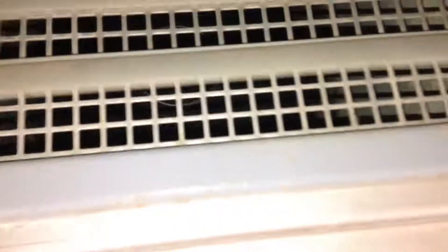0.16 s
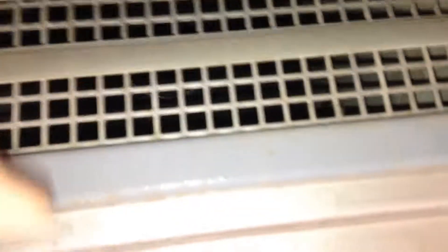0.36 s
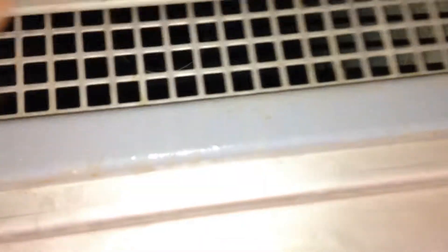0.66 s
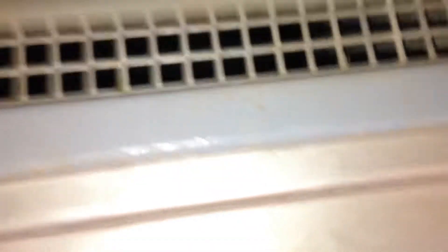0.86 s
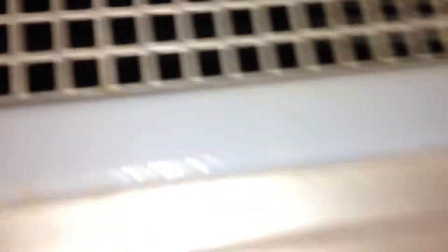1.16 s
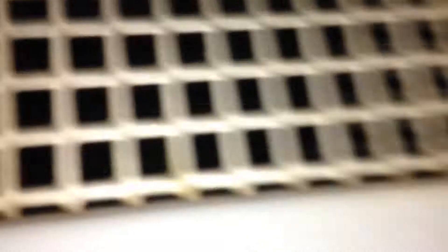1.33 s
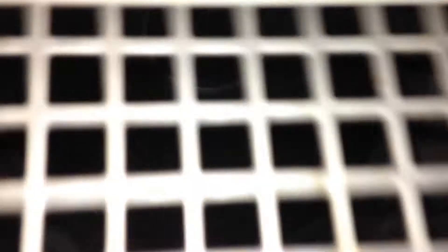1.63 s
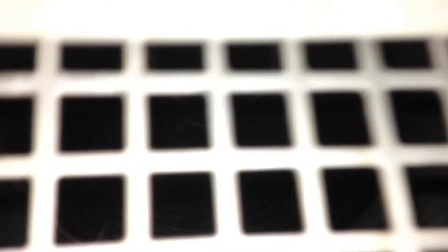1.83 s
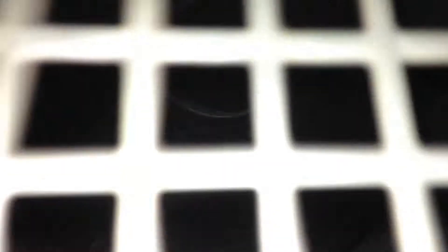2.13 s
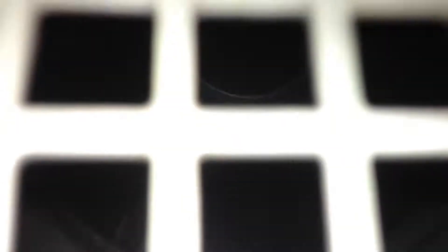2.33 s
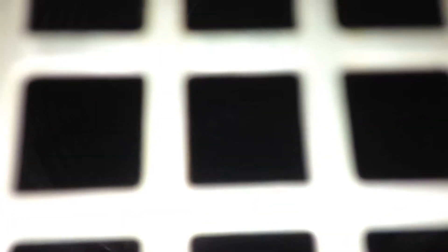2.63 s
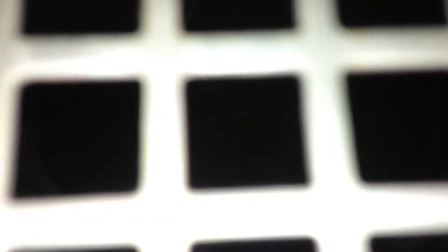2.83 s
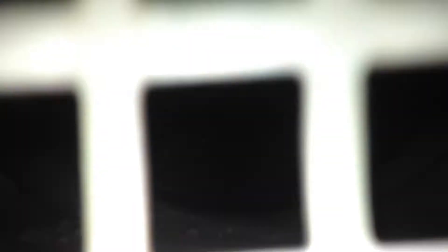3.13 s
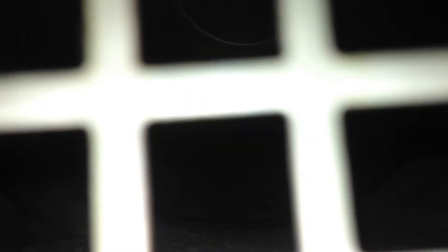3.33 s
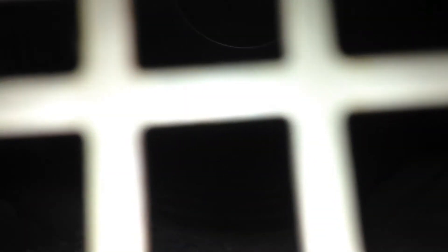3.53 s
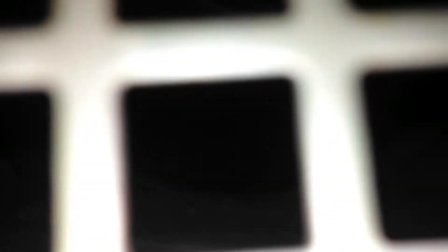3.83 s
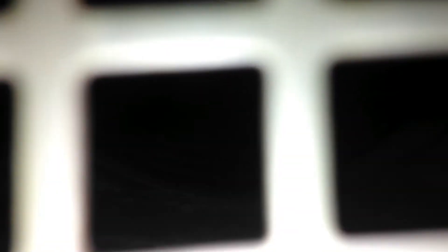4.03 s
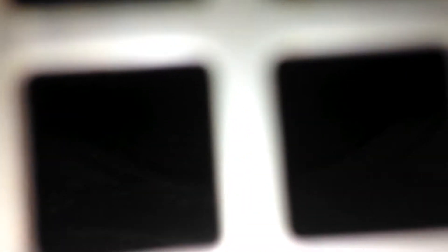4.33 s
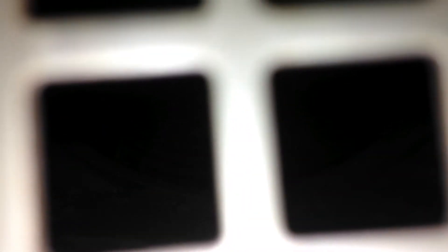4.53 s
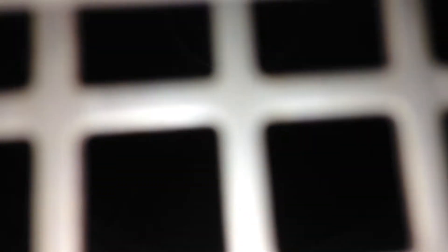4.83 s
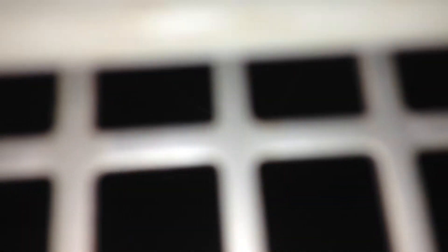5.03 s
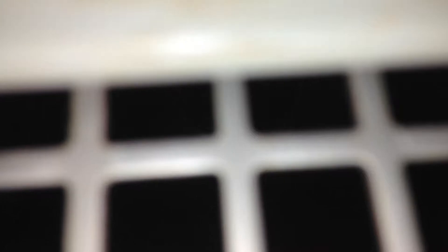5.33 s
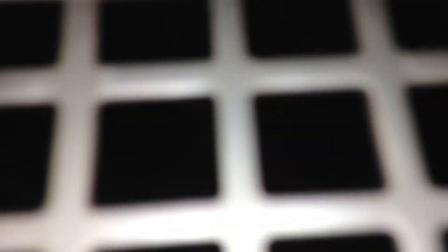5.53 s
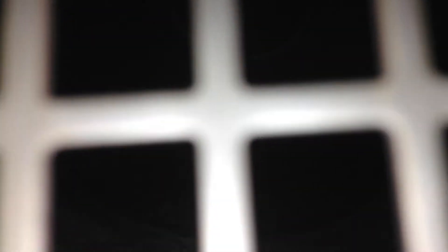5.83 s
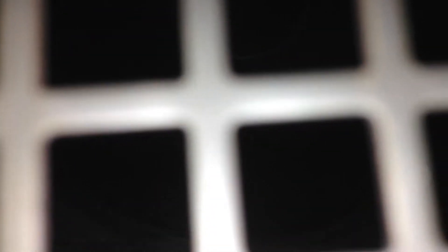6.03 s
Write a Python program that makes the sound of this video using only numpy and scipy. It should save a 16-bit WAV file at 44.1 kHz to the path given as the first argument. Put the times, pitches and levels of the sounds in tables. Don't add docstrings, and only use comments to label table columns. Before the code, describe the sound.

Big exhaust fans rush and hum with a thin high whine as a bare microphone pushes into the jet, wind thumping, puffing and crackling over it.

```python
import sys
import numpy as np
from scipy import signal
from scipy.fft import rfft, irfft
from scipy.io import wavfile
from scipy.ndimage import uniform_filter1d, minimum_filter1d

SR = 44100
rng = np.random.default_rng(int(sys.argv[2]) if len(sys.argv) > 2 else 0)


def pcm_store(signal):
    levels = np.round(np.clip(np.atleast_2d(signal), -1, 1) * 32767)
    wavfile.write(sys.argv[1], SR, levels.astype(np.int16).T)


def volts_from_decibels(level):
    exponent = np.asarray(level, float) / 20
    return 10 ** exponent


N = 272538
SHAFT_HZ, BLADES = 23.3, 6


def evened(x):
    return x / np.sqrt(np.mean(x ** 2) + 1e-20)


def curve(rows, column):
    rows = np.array(rows)
    return np.interp(np.arange(N) / SR, rows[:, 0], rows[:, column])


def colour(x, points):
    point_hz, point_db = np.transpose(points)
    hz = np.fft.rfftfreq(len(x), 1 / SR)
    gain_db = np.interp(np.log(hz + 1), np.log(point_hz + 1), point_db, -120, -120)
    return evened(irfft(rfft(x) * volts_from_decibels(gain_db), len(x)))


def lumps(hz):
    lowpass = signal.butter(2, hz, fs=SR, output="sos")
    return evened(signal.sosfilt(lowpass, rng.standard_normal(N)))


def add(mix, s, sound):
    start = max(round(s * SR) - len(sound) // 2, 0)
    part = mix[start:][:len(sound)]
    part += sound[:len(part)]


def each_turn(memory):
    period = round(SR / SHAFT_HZ)
    fresh = rng.standard_normal((N // period + 30, period))
    turns = signal.lfilter([1], [1, -memory], fresh, axis=0)
    return evened(turns.ravel()[-N:])


def resonate(x, hz, width_hz):
    carrier = np.exp(2j * np.pi * np.cumsum(hz) / SR)
    r = np.exp(-np.pi * width_hz / SR)
    return 2 * (carrier * signal.lfilter([1 - r], [1, -r], x / carrier)).real


def held(level_db, fall_db_per_s):
    climb = np.arange(N) * fall_db_per_s / SR
    return np.maximum.accumulate(level_db + climb) - climb


# pitch_hz [Hz], level_db [dB]
DRIVE_LINES = [(3956, -72), (4020, -72), (4222, -73), (4565, -75), (4820, -75), (5326, -73), (5624, -73),
               (5693, -74), (6087, -74), (6215, -76), (6505, -78.5), (7603, -79.5)]


def tones():
    t = np.arange(N) / SR
    out = np.zeros(N)
    for hz, db in DRIVE_LINES:
        level = volts_from_decibels(db + 3 + 1.4 * lumps(2.7))
        out += level * np.sin(2 * np.pi * (hz * t + rng.random()))
    return out


# time_s [s], level_db [dB]
HUM_LEVEL = [(0.0, -9), (0.12, -18.5), (0.27, -7), (0.41, -18), (0.76, -12), (0.89, -44), (1.05, -34),
             (1.69, -36), (2.31, -42), (3.51, -41), (4.23, -14), (4.54, -30), (4.82, -13.5), (6.11, -31),
             (6.18, -31)]


def hum():
    turns = np.cumsum(BLADES * SHAFT_HZ + 9.03 * lumps(20.7)) / SR
    level_db = curve(HUM_LEVEL, 1) - 8.5 + 3.5 * lumps(14)
    return np.sqrt(2) * np.sin(2 * np.pi * turns) * volts_from_decibels(level_db)


# pitch_hz [Hz], density_db [dB per Hz]
RUSH_COLOUR = [(200, -0.5), (300, -13.5), (600, -16.5), (900, -12.5), (1250, -17.5), (1500, -13.5),
               (2300, -19), (2800, -25.5), (3200, -24.5), (4000, -26), (6000, -32.5), (10300, -41),
               (12300, -45), (13500, -50), (15700, -50)]


def rush():
    air = colour(rng.standard_normal(N), RUSH_COLOUR)
    hz = np.fft.rfftfreq(N, 1 / SR)
    power = np.abs(rfft(air)) ** 2
    treble = (hz > 6000) & (hz < 10000)
    share = np.sqrt(power[treble].sum() / power.sum())
    return air / share * volts_from_decibels(-59 + 0.76 * lumps(22))


# pitch_hz [Hz], density_db [dB per Hz]
SHELL_COLOUR = [(10400, -27), (10900, -17), (11150, -6), (11400, 0), (11650, -4), (12000, -9),
                (12200, -14.5), (12500, -18.5), (12750, -36)]
# time_s [s], steadiness [0-1]
HAND_STEADY = [(0, 0), (1.2, 0.1), (2.2, 1), (6.18, 0.55)]
# time_s [s], pitch_hz [Hz]
GRILLE_PITCH = [(0, 11260), (1.2, 11320), (1.7, 11480), (2.3, 11300), (2.8, 11400), (3.2, 11420),
                (6.18, 11440)]
# time_s [s], level_db [dB]
GRILLE_OPENING = [(0, 8), (.5, 5), (1.2, 4), (1.7, 1.5), (2.3, 3.5), (2.8, -0.8), (3.2, 1), (3.8, 1.5),
                  (4.6, 1.5), (5.4, -1), (6.18, -1)]


def whine():
    steady = curve(HAND_STEADY, 1)
    repeating = np.sqrt(steady) * each_turn(.62)
    scrape = repeating + np.sqrt(1 - steady) * rng.standard_normal(N)
    rough = each_turn(.98)
    spots = evened(uniform_filter1d(uniform_filter1d(rough, size=50), size=50))
    patches = evened(uniform_filter1d(uniform_filter1d(rough, size=350), size=350))
    angle = 2 * np.pi * SHAFT_HZ * np.arange(N) / SR
    wobble_hz = steady * (150 * np.sin(angle) + 90 * np.sin(2 * angle + 1))
    ring = colour(scrape, SHELL_COLOUR)
    favoured = resonate(ring, curve(GRILLE_PITCH, 1) + wobble_hz, 150)
    ring = ring + volts_from_decibels(4) * evened(favoured)
    load_db = .8 * spots + .6 * patches + 1.4 * np.cos(BLADES * angle)
    return evened(ring * volts_from_decibels(load_db)) * volts_from_decibels(-50 + curve(GRILLE_OPENING, 1))


# time_s [s], level_db [dB], length_s [s]
RUSTLES = [
    (1.158, -62, .01),
    (1.193, -46, 0.013),
]
# time_s [s], level_db [dB]
STEPS = [
    (5.2828, -20.5),
    (6.1774, -39),
]


def handling():
    out = np.zeros(N)
    for s, db, length_s in RUSTLES:
        window = signal.windows.hann(round(2 * length_s * SR))
        add(out, s, volts_from_decibels(db) * window * np.diff(rng.standard_normal(len(window) + 1)))
    for s, db in STEPS:
        t = np.arange(-200, 200) / SR
        add(out, s, volts_from_decibels(db + 13) * (t >= 0) * np.exp(-np.abs(t) / .0009))
    return out


# time_s [s], strength_db [dB], large_eddy_excess_db [dB]
JET_PATH = [(0, -32.5, 18.5), (.79, -31.5, 8.5), (.85, -28.5, 14), (1.15, -34, 13), (1.2, -27, 11),
            (1.5, -22.5, -4), (1.72, -32, 10.5), (1.8, -22.5, 0), (2.06, -22, 0.5), (2.26, -19, -2),
            (2.9, -19, 0.5), (3.11, -16.5, -2), (3.6, -19.5, 5.5), (4.2, -20, 3.5), (5.1, -21, 6.5),
            (5.76, -19.5, 5), (6.0, -23, 4), (6.18, -22, 0)]


def jet_db():
    return curve(JET_PATH, 1) + 20


# pitch_hz [Hz], density_db [dB per Hz]
RUMBLE_COLOUR = [(12, -57), (20, -37), (56, -3), (75, 1.5), (107, -3), (139, 2), (600, -24.5), (780, -55),
                 (1320, -120)]
ROAR_COLOUR = [(100, -7), (220, 0.5), (320, -2), (500, -4.5), (750, -12), (1300, -28)]
FLUTTER_COLOUR = [(400, 0), (750, -3), (1200, -5.5), (2000, -13.5), (3500, -23), (6000, -45)]
# time_s [s], swell_db [dB], length_s [s]
CLUSTERS = [(1.34, 2, 0.33), (1.94, 5.5, .06), (2.35, 2.5, 0.037), (2.452, 4, 0.043), (2.533, 7.5, 0.038),
            (2.728, 3, 0.038), (3.207, -2, 0.026), (4.176, 5, 0.3), (4.332, 6, .03), (4.486, 6, 0.021),
            (4.65, 5.5, 0.027), (4.717, -7, .025), (4.948, 0, 0.025), (5.004, 7, .03), (5.038, 6, 0.036),
            (5.609, 6, 0.075), (5.957, 10, 0.052), (6.036, 7.5, 0.021), (6.116, 4, 0.035),
            (6.152, 10.5, 0.042)]


def wind():
    gusts, flicker = lumps(29), lumps(67)
    crackle = np.clip(lumps(350) - .8, 0, 1.6)
    jet, swell = jet_db(), np.zeros(N)
    for s, db, _ in SNAP_EVENTS:
        add(swell, s, .5 * max(db + 26, 0) * signal.windows.hann(round(.04 * SR)))
    for s, db, length_s in CLUSTERS:
        add(swell, s, db * signal.windows.hann(round(length_s * SR)))
    # spectrum, level, then swing in dB by gust, flicker and crackle
    layers = [(RUMBLE_COLOUR, -22 + jet + curve(JET_PATH, 2), 1.2, .3, .1),
              (ROAR_COLOUR, -20.5 + 1.05 * jet + 0.9 * swell, 1.5, 2.8, 1.2),
              (FLUTTER_COLOUR, -32 + 0.47 * jet + swell, 1.2, 2.3, 4.8)]
    out = np.zeros(N)
    for shape, level_db, gust_db, flicker_db, crackle_db in layers:
        swing_db = gust_db * gusts + flicker_db * flicker + crackle_db * crackle
        eddies = colour(rng.standard_normal(N), shape) * volts_from_decibels(swing_db)
        out += evened(eddies) * volts_from_decibels(level_db)
    return out


# start_s [s], level_db [dB], pitch_hz [Hz]
THUMP_EVENTS = [(0.267, -2, 144), (0.497, -6, 188), (.673, -5, 140), (.734, -5, 140), (0.775, -2.5, 148),
                (0.94, -6.5, 130), (1.094, 3.5, 141), (1.192, 4, 214), (1.31, -7, 104), (1.575, -1.5, 102),
                (1.837, 0.5, 232), (1.907, 1.5, 211), (2.084, -4, 164), (2.268, 4, 200), (2.328, -4.5, 82),
                (2.53, -1.5, 159), (2.999, -5, 312), (3.07, 1, 326), (3.597, -2, 218), (3.838, -0.5, 147),
                (4.198, -6, 136), (4.4, -9, 109), (4.822, -4, 133), (5.039, 5, 192), (5.545, -6, 137),
                (5.6, -.5, 145), (5.829, 0.5, 145), (5.943, -14, 261), (6.027, -25, 306), (6.161, -5, 110)]


def thumps():
    out = np.zeros(N)
    for s, db, hz in THUMP_EVENTS:
        window = signal.windows.hann(round(2.53 * SR / hz))
        t = np.arange(len(window)) / SR
        swings = np.cos(2 * np.pi * (hz * t + rng.random()))
        add(out, s + 0.772 / hz, volts_from_decibels(db - 3.5) * window * swings)
    return out


PLAIN_TREBLE_DB = -17


def strays():
    when, size = rng.random((90, 2)).T
    when = when * (N / SR - .02)
    db = -26.5 - 3.5 * np.log(1.08 - size) + 1.5 * jet_db()[(when * SR).astype(int)]
    return list(zip(when, db, np.full(len(db), PLAIN_TREBLE_DB)))


def bursts(events, length_s, shape, trim_db):
    swings = colour(rng.standard_normal(N), shape)
    window = signal.windows.tukey(round(length_s * SR), .85)
    out = np.zeros(N)
    for s, db, hz in events:
        place = rng.random() * (N - SR) + np.arange(len(window)) * hz / 1000
        burst = np.interp(place, np.arange(N), swings)
        add(out, s + length_s / 2, volts_from_decibels(db + trim_db) * window * evened(burst))
    return out


# start_s [s], level_db [dB], pitch_hz [Hz]
PUFF_EVENTS = [(.229, -13, 505), (.835, -11, 448), (1.228, -6.5, 308), (1.376, -2, 308), (1.465, -9, 506),
               (1.506, -6.5, 382), (1.577, -3, 600), (1.65, -9.5, 460), (1.774, -4, 474),
               (1.846, -4.5, 274), (1.913, -7, 473), (1.981, -4, 373), (2.035, -5, 287), (2.091, -5, 585),
               (2.142, -8, 575), (2.575, -10, 526), (3.035, -15, 416), (3.211, -11, 544), (3.561, -5, 410),
               (3.638, -7, 310), (3.855, -3.5, 560), (4.04, -9.5, 583), (4.398, 3, 320), (4.478, -18, 352),
               (4.517, -10, 480), (4.778, -4, 502), (5.208, -8.5, 473), (5.942, 5, 322), (6.031, -2.5, 313),
               (6.114, -8.5, 442)]
# start_s [s], level_db [dB], treble_share_db [dB]
SNAP_EVENTS = [(1.9275, -18.5, -15.5), (2.0906, -15.5, -14), (2.2476, -16, -13), (2.2917, -41, -23),
               (2.3336, -25, -9), (2.712, -24, -11), (2.7312, -23.5, -13), (2.904, -26, -15),
               (3.2221, -24.5, -21.5), (3.3468, -17, -14.5), (3.4319, -8, -18), (3.6997, -19, -19),
               (3.7334, -19, -21), (3.8703, -16.5, -18), (3.9953, -15.5, -13.5), (4.1016, -11.5, -19),
               (4.2278, -14.5, -16.5), (4.3314, -22.5, -24), (4.395, -20.5, -14), (4.4786, -23.5, -12.5),
               (4.5198, -23, -17.5), (4.6049, -21, -16.5), (4.6443, -21, -21.5), (4.7272, -15, -19.5),
               (5.437, -21.5, -15.5), (5.7095, -16, -14.5), (5.7468, -17, -10), (5.7573, -15.5, -16),
               (5.8753, -21, -7), (5.9904, -18.5, -15)]


def puffs():
    dull_colour = [(250, 20), (550, 11), (1000, 15), (2000, -2), (4000, -13)]
    snap_colour = [(200, -26), (500, 6), (900, 0.5), (1700, -10), (3500, -31)]
    dull = bursts(PUFF_EVENTS, .011, dull_colour, -5.0)
    snaps = []
    for s, db, treble_db in SNAP_EVENTS + strays():
        hz = 1400 * volts_from_decibels(0.322 * (treble_db - PLAIN_TREBLE_DB))
        snaps.append((s + 0.000977, db, hz))
    return dull + bursts(snaps, 0.0066, snap_colour, 0.17)


def ducking(blows):
    power_db = 10 * np.log10(uniform_filter1d(blows ** 2, size=600).clip(1e-12))
    over_db = np.maximum(held(power_db, 32) + 13.5, 0)
    jet = np.minimum(uniform_filter1d(jet_db(), size=6000), -2)
    lean_db = held(jet, 9)
    quick = volts_from_decibels(-.64 * uniform_filter1d(over_db, size=200))
    return quick, volts_from_decibels(-.64 * lean_db)


# pitch_hz [Hz], threshold_db [dB]
HIDDEN_BELOW = [(7000, -36), (9500, -26), (10450, -22.5), (11000, -30), (11950, -18), (12450, -21),
                (13500, -23), (16000, -26)]


def masked(x):
    hz, _, z = signal.stft(x, SR, nperseg=1024, noverlap=768)
    width = 4
    power = uniform_filter1d(np.abs(z[:512]) ** 2, size=7, axis=1)
    power = power.reshape(-1, width, z.shape[1]).mean(1)
    band_hz = hz[:512].reshape(-1, width).mean(1)
    shell = uniform_filter1d(power[(band_hz > 11100) & (band_hz < 11700)].mean(0), size=30)
    point_hz, point_db = np.transpose(HIDDEN_BELOW)
    threshold_db = np.interp(band_hz, point_hz, point_db, -200)
    keep = power > shell * volts_from_decibels(2 * threshold_db)[:, None]
    z[:512] *= np.repeat(keep, width, axis=0)
    return signal.istft(z, SR, nperseg=1024, noverlap=768)[1][:N]


def scene():
    blows = wind() + thumps() + puffs()
    quick, slow = ducking(blows)
    fans = quick * (slow * rush() + whine() + tones()) + hum()
    return (fans + blows + handling())[None]


def low_pass(x):
    return signal.sosfilt(signal.butter(12, 15740, fs=SR, output="sos"), x)


def record(dry):
    room = np.minimum(.71 / (np.abs(dry) + 1e-9), 1)
    lowest = minimum_filter1d(room, size=81)
    gain = uniform_filter1d(uniform_filter1d(lowest, size=41), size=41)
    mix = masked((dry * gain)[0])[None]
    return low_pass(mix)


dry = scene()
out = record(dry)
pcm_store(out)
```